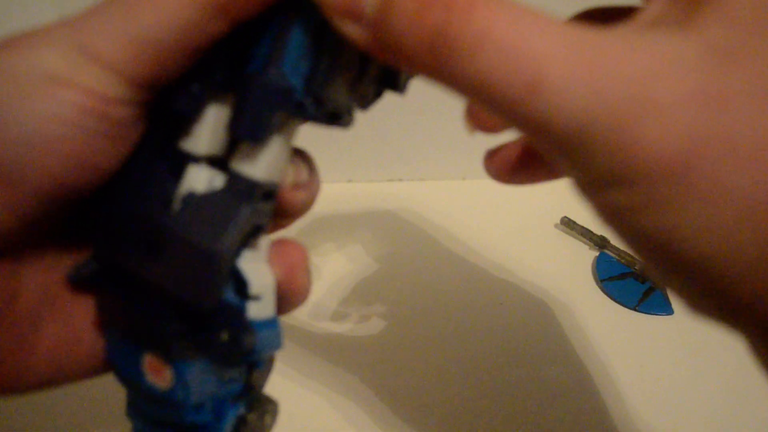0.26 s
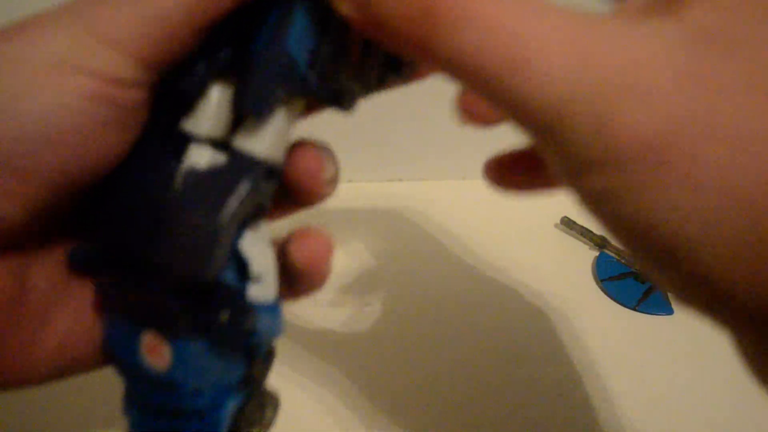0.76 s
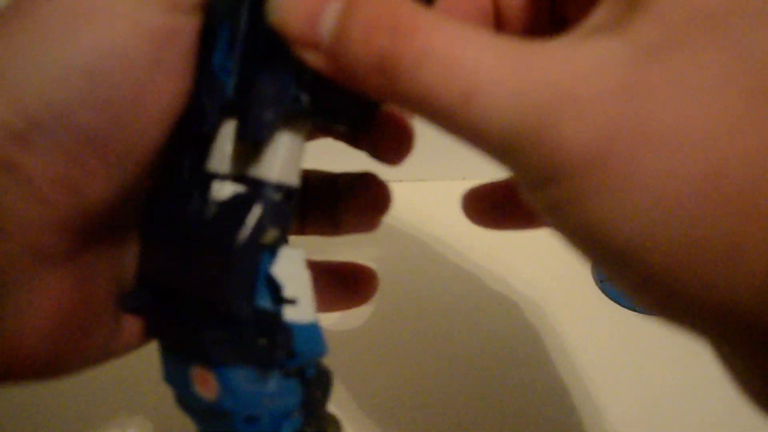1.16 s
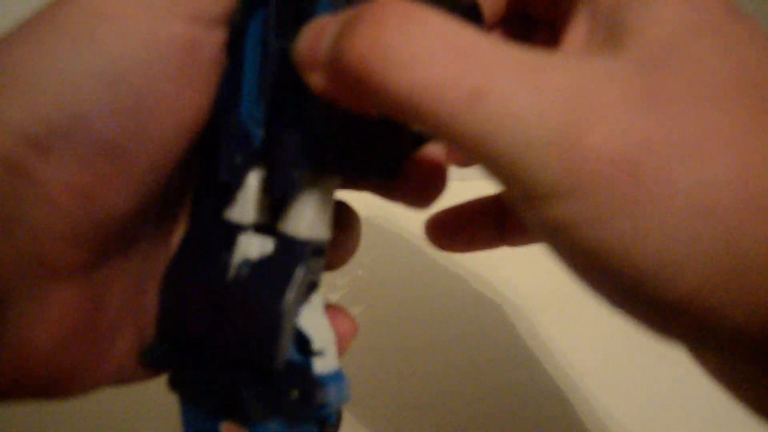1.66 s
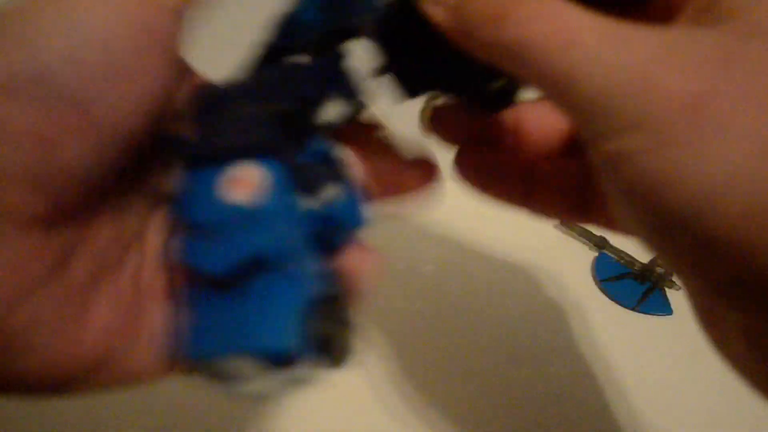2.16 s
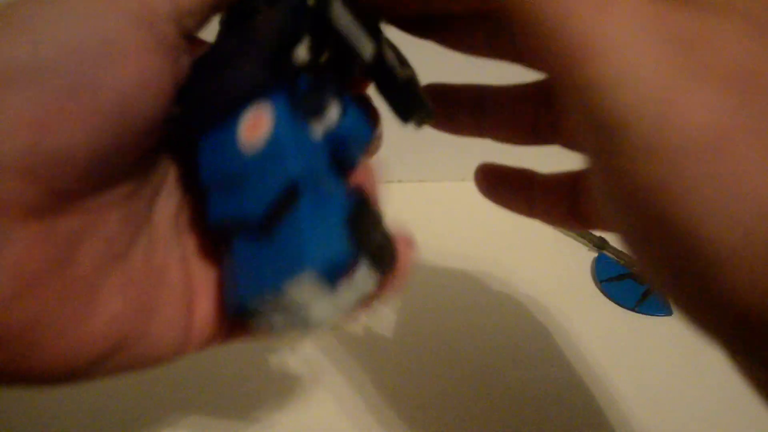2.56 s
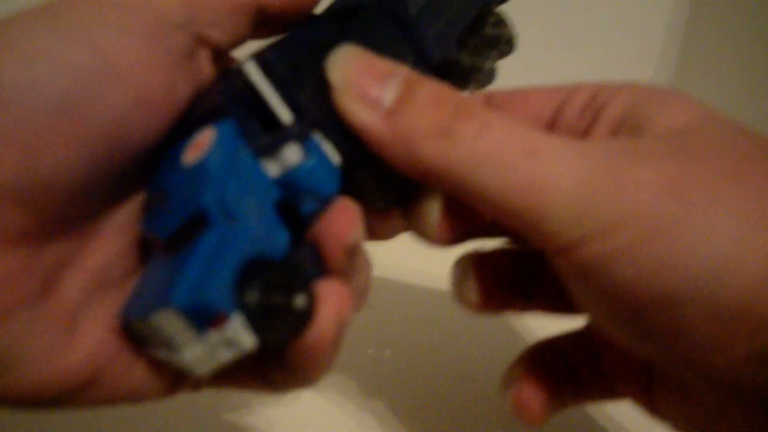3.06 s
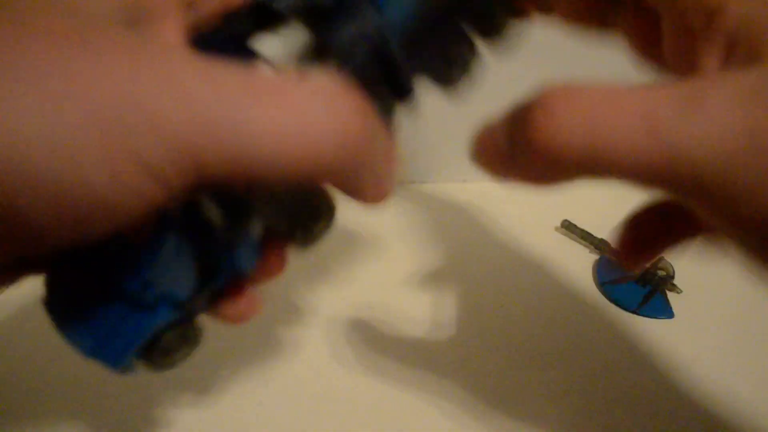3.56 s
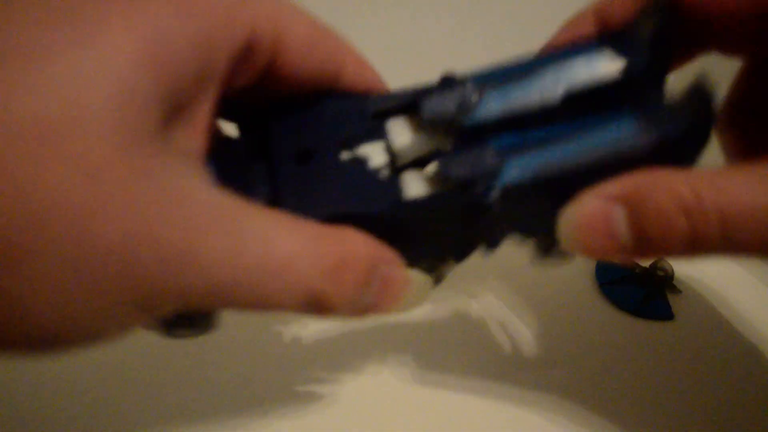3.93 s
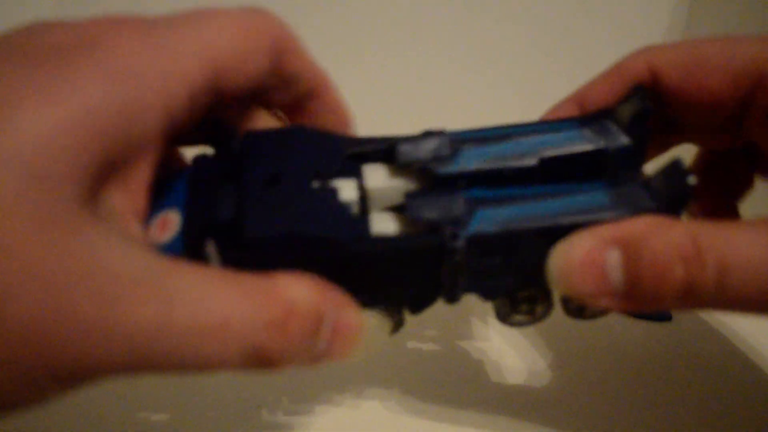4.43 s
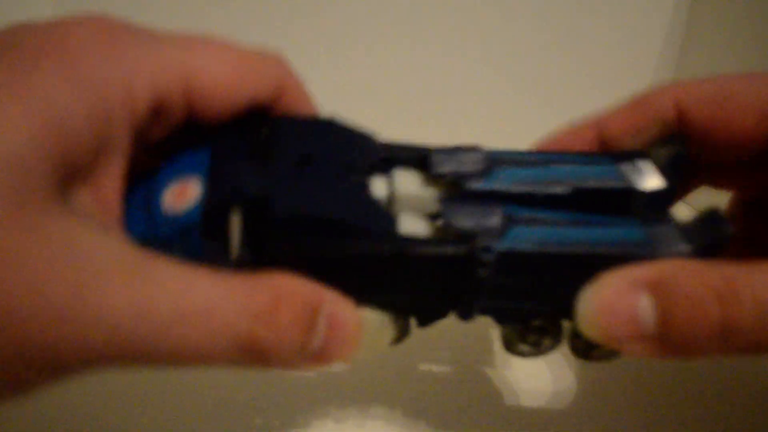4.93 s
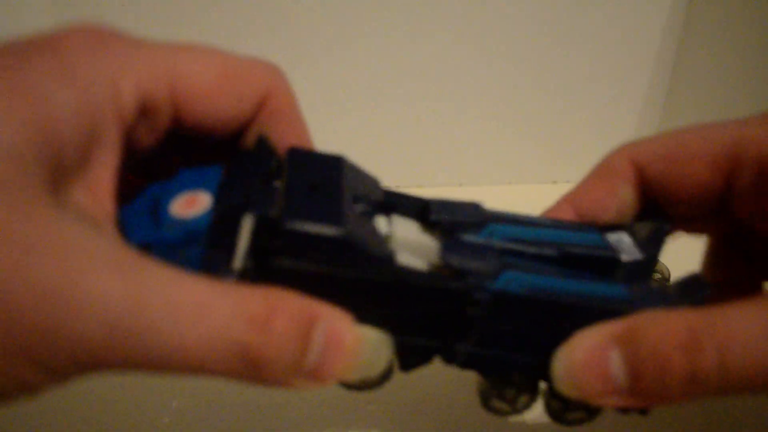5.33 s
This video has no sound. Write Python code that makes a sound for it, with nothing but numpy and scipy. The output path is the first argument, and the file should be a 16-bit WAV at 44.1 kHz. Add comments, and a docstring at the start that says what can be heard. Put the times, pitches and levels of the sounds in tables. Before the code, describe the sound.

Close handling of a jointed plastic toy: sparse clicks grow into snapping, creaking and loose rattling, with soft bumps and finger swishes.

```python
"""A hollow plastic toy figure is folded by hand at close range, in a small room that answers every move.
From the start, filtered noise gives the air and the hands' rumble; two sines give a faint hum and a thin whine.
Joints click and soft bumps land at once: bursts of tiny impacts ring the shell, bumps are short low pulses.
From about 0.65 s tight parts scrape in clumps of ringing grains and loose parts rattle; a big snap lands near 2.5 s.
From 3.5 s fingers swish over the shell as coloured noise; after a last firm snap near 5.1 s scraping goes on."""
import sys
import numpy as np
from scipy import signal
from scipy.fft import rfft, irfft, next_fast_len
from scipy.io import wavfile
from scipy.ndimage import uniform_filter1d, map_coordinates

SR = 44100
rng = np.random.default_rng(int(sys.argv[2]) if len(sys.argv) > 2 else 0)


def store_wav(level_fs):
    """Save 16-bit WAV to argv[1]."""
    pcm = np.round(np.clip(np.atleast_2d(level_fs), -1, 1) * 32767)
    wavfile.write(sys.argv[1], SR, pcm.T.astype(np.int16))


N = 246519  # length in samples


def amp(db):
    """Decibels to gain."""
    return 10 ** (np.asarray(db) / 20)


def unit(x):
    """Scale to rms 1."""
    return x / np.sqrt(np.mean(x ** 2) + 1e-20)


def along(points, hz):
    """Read (Hz, value) points on a log frequency axis."""
    point_hz, values = np.transpose(points)
    return np.interp(np.log(hz + 1), np.log(point_hz + 1), values)


def curve(rows):
    """Join (s, value) points by straight lines, one value per sample."""
    return np.interp(np.arange(N) / SR, *np.transpose(rows))


def wobble(rate):
    """A smooth random curve with rate knots a second."""
    knots = rng.standard_normal(int(N * rate / SR) + 4)
    return map_coordinates(knots, [np.arange(N) * rate / SR])


def add(track, s, sound):
    """Mix a sound into the track at time s."""
    part = track[max(0, round(s * SR)):][:len(sound)]
    part += sound[:len(part)]


def coloured(x, spectrum):
    """Minimum-phase filter with the given spectrum, so that attacks stay sharp."""
    m = 2 * next_fast_len(len(x))
    level_db = along(spectrum, np.fft.rfftfreq(m, 1 / SR))
    cepstrum = irfft(np.log(amp(level_db)), m)
    # folding the cepstrum forward makes the filter causal
    cepstrum[1:m // 2] *= 2
    cepstrum[m // 2 + 1:] = 0
    return irfft(rfft(x, m) * np.exp(rfft(cepstrum)), m)[:len(x)]


def band(x, edges_hz, order=3):
    """Causal band-pass."""
    return signal.sosfilt(signal.butter(order, edges_hz, "bandpass", fs=SR, output="sos"), x)


def resonance(x, hz, q):
    """One resonance of quality q."""
    return signal.lfilter(*signal.iirpeak(hz, q, fs=SR), x)


def ring(t, hz, t60):
    """One damped mode: a sine that falls by 60 dB in t60 seconds."""
    return np.sin(2 * np.pi * hz * t) * amp(-60 * t / t60)


def stroke(start, length, attack, release):
    """Gain of one hand movement: it swells, holds and dies away, 20 dB per attack or release time."""
    t = np.arange(N) / SR
    before = np.maximum(start - t, 0)
    after = np.maximum(t - start - length, 0)
    return amp(-20 * (before / attack + after / release))


# steady hum and whine: pitch_hz, level_db (rms)
TONES = [(350, -73), (15671, -82.5)]


def hum_and_whine():
    """Steady electrical tones: a faint hum and a thin, very high whine, each a pure sine."""
    t = np.arange(N) / SR
    return sum(amp(db) * unit(np.sin(2 * np.pi * hz * t)) for hz, db in TONES)


# colour of the room noise: frequency_hz, density_db (per Hz, relative)
AIR_COLOUR = [(15, -22.5), (25, -44), (90, -24), (125, -12.5), (237, -9), (309, -7.5), (354, -2.5),
              (588, -18.5), (637, -12), (691, -17.5), (952, -12.5), (1240, -14), (2020, -20.5),
              (2370, -26.5), (15000, -53.5)]


def air(level_db=-55.5):
    """Steady room noise: coloured random noise."""
    return amp(level_db) * unit(coloured(rng.standard_normal(N), AIR_COLOUR))


# rumble of the moving hands: time_s, level_db (before its lumps)
HAND_RUMBLE = [(0, -72.5), (1.4, -72), (2.2, -68), (2.5, -62.5), (2.9, -68), (3.6, -57.5), (3.85, -71),
               (4.4, -61), (5.1, -66), (5.59, -63)]


def rumble(lows_hz=(28, 110), lumps_db=3.0, lump_rate=19):
    """Moving hands rumble: low noise whose level follows the movement and wanders in lumps."""
    lows = unit(band(rng.standard_normal(N), lows_hz, order=2))
    return amp(curve(HAND_RUMBLE) + lumps_db * wobble(lump_rate)) * lows


# modes of the hollow shell: pitch_hz, level_db (relative), t60_s; each contact scatters pitch and level
SHELL_MODES = [(700, -7.5, 0.019), (950, -12, 0.0081), (1180, -14.5, 0.054), (1566, -5.5, 0.021),
               (1647, 0.5, 0.016), (1856, -6.5, 0.064), (1969, -4.5, 0.034), (2204, -6.5, 0.021),
               (2493, -4.5, 0.04), (2702, 2, 0.024), (2893, -4, 0.034), (3086, 0, 0.019),
               (3534, -2.5, 0.03), (3895, 0, 0.017), (4590, 2, 0.0059), (5170, -6, 0.033),
               (5510, -4.5, 0.017), (6400, -5.5, 0.013), (7640, -7, 0.018), (8080, -6.5, 0.0087),
               (12260, -1.5, 0.018), (14300, -12.5, 0.0052)]


def shell(t, scatter_db):
    """The shell's answer to one contact; grip and contact point shift its modes."""
    answer = np.zeros(len(t))
    for hz, db, t60 in SHELL_MODES:
        pitch_chance, level_chance, side = rng.standard_normal(3)
        shifted_hz = hz * (1 + .015 * pitch_chance)
        answer += np.sign(side) * amp(db + scatter_db * level_chance) * ring(t, shifted_hz, t60)
    return answer


KNOCK_HZ, SHELL_HZ, EDGE_HZ, TICK_HZ = (480, 1400), (1200, 4500), (4500, 9600), (10500, 15400)
PANEL_SWING = 0.13  # a harder click swings the panel more (dB per dB above a light click)
LIGHT_CLICK_DB = -40
CLICK_SPAN_S = .01  # a click's shell level is its energy spread over this time
CLICK_SAMPLES = SR // 10


def click(shell_db, panel_hz, knock_db, edge_db, tick_db, slip_t60=0.015, rise=0.00061,
          crack_db=-3, crack_t60=0.036, panel_db=-4, panel_t60=0.018, panel_q=1.0, treble_t60=0.18):
    """A tab slips over its catch in a burst of tiny impacts that rings the shell and the struck panel."""
    t = np.arange(CLICK_SAMPLES) / SR
    onset = 1 - np.exp(-(t / rise) ** 2)
    slips = rng.standard_normal(len(t)) * onset * amp(-60 * t / slip_t60)
    body = signal.fftconvolve(slips, shell(t, scatter_db=2.5))[:len(t)]
    crack = rng.standard_normal(len(t)) * onset * amp(-60 * t / crack_t60)
    blow = unit(body) + amp(crack_db) * unit(crack)
    # modes near the pitch of the struck panel answer most strongly
    near = unit(resonance(band(blow, SHELL_HZ, order=4), panel_hz, panel_q))
    swing_db = panel_db + PANEL_SWING * (shell_db - LIGHT_CLICK_DB)
    panel = amp(swing_db) * unit(onset * ring(t, panel_hz, panel_t60))
    # the panel swings with those modes, never against them
    sound = unit(near + np.sign(near @ panel) * panel)
    # a heavy push adds knock; a hard corner adds edge and tick, which the plastic damps sooner
    bright = blow * amp(-60 * t / treble_t60)
    for source, edges_hz, db in ((blow, KNOCK_HZ, knock_db), (bright, EDGE_HZ, edge_db), (bright, TICK_HZ, tick_db)):
        sound = sound + amp(db) * unit(band(source, edges_hz, order=4))
    return amp(shell_db) * sound * np.sqrt(CLICK_SPAN_S / t[-1])


# joints and tabs that click: start_s, shell_db (over 10 ms, before the trim), panel_hz,
# knock_db, edge_db, tick_db (these three against the shell)
JOINT_CLICKS = [(0.0124, -50.5, 1716, -21, 10, 5), (0.1164, -51.5, 1690, -9, -5, -8.5),
                (0.643, -56, 1610, -10, -1, -21), (0.6695, -45.5, 1740, -8, -9.5, -19),
                (0.7, -48, 1570, -6, -23, -40), (0.776, -42.5, 2180, -28, -9.5, -38),
                (0.948, -36.5, 1570, -34, -12, -18), (0.956, -38.5, 1850, -31, -3.5, -24),
                (1.0598, -41, 1720, -10.5, -4, -33), (1.083, -39.5, 1760, -12, -20, -20.5),
                (1.0892, -30.5, 1810, -21, 1.5, -16), (1.132, -40, 1850, -25, -14, -35),
                (1.3279, -34, 1835, -30, -5, -25), (1.352, -57, 1710, -11, -5, -5),
                (1.4378, -28.5, 1640, -24, -9, -23.5), (1.5478, -55, 1750, -20, -30, -35),
                (1.5667, -44, 1620, -15, -18, -39), (1.6092, -37.5, 1630, -29, -25, -40),
                (1.726, -30.5, 2565, -13, -8, -18), (1.744, -49.5, 2530, -0.5, 1, -21),
                (1.7683, -28, 2640, -16.5, -16.5, -10), (1.8415, -45, 1760, -7.5, -22, -30),
                (1.978, -36, 1680, -38, -15, -19.5), (2.051, -36, 2540, -26, -27, -42),
                (2.0796, -40.5, 2660, -32, -13, -26), (2.1621, -42, 2900, -30, -6.5, -36),
                (2.2194, -32.5, 2100, -27, -11.5, -40), (2.262, -35.5, 2755, -30, -16, -39),
                (2.3208, -36.5, 1560, -13, 0, -40), (2.327, -34.5, 3100, -16, -7, -8),
                (2.34, -36.5, 3070, -23, -7, -26.5), (2.4417, -50, 2380, -20, -7, -14),
                (2.4812, -18, 1925, -19, -9, -10), (2.483, -23, 1394, -11.5, -11, -9.5),
                (2.489, -20, 2810, -46, -22, -34), (2.595, -40, 2070, -36, -2, -34.5),
                (2.612, -37, 3880, -35, -16, -18), (2.6519, -30, 2814, -43, -11.5, -35),
                (2.668, -35, 2740, -18, -19, -34), (2.703, -45, 3100, -27, -20, -39),
                (2.808, -53, 1760, -23, -8, -20), (2.8595, -43, 2850, -12.5, -19, -36),
                (2.9409, -45, 2610, -9, -11, -16), (2.993, -42.5, 1840, -8, -4, -22),
                (3.023, -42.5, 2070, -1, -3, -23.5), (3.05, -43.5, 1900, -34, -17, -43),
                (3.117, -42.5, 2810, -33, -29, -38), (3.3051, -39, 2790, -13, -15, -40),
                (3.4024, -29, 1777, -16, -14, -30.5), (3.4322, -33, 1695, -38, -19, -29),
                (3.482, -34, 1806, -11.5, -10, -28), (3.5403, -33, 3000, -14, -9.5, -30),
                (3.6475, -26.5, 1938, -21, -16.5, -26), (3.7308, -36.5, 3300, -22, -27, -39),
                (3.82, -41, 3080, -10, -16, -31), (3.8442, -41, 2650, -7.5, -17, -18.5),
                (3.8871, -31.5, 2020, -12, -5, -30), (4.085, -42.5, 1535, -37, -26, -39),
                (4.1425, -52, 3180, -5, -29, -32), (4.242, -55, 3780, -15, -11, -19),
                (4.334, -54, 2660, -9, -31, -37), (4.372, -50.5, 2520, -29, -9.5, -27),
                (4.414, -47, 1657, -13, -22, -26), (4.504, -48, 2490, -9, -7.5, -30),
                (4.598, -41.5, 2810, -4, -12.5, -37), (4.6384, -39, 2900, 0.5, -4, -22),
                (4.643, -40.5, 2800, -13, -9, -12), (4.7447, -49.5, 1560, -3.5, -20, -37),
                (4.886, -55.5, 1470, -16, -12, -19), (4.987, -42, 2930, -19, -32, -37),
                (5.089, -36, 2920, -14, -16.5, -26), (5.129, -23, 2920, -11.5, -10, -15),
                (5.169, -41, 3300, -20, -8, -16.5), (5.184, -36.5, 2650, -13, -17, -32),
                (5.2536, -45, 1920, -16, -16, -31), (5.302, -49, 2770, -7, -17, -33)]


def clicks(trim_db=-1.0):
    """All the joints and tabs, each a burst of impacts on the shell."""
    track = np.zeros(N)
    for start, *contact in JOINT_CLICKS:
        add(track, start, click(*contact))
    return amp(trim_db) * track


# decay of the room: frequency_hz, t60_s (of the tail without its early boost)
ROOM_DECAY = [(300, 0.62), (2000, 0.2), (6000, 0.14), (14000, 0.19)]


def room(x, delay=0.0065, early_gain=1.2, early_life=0.041, treble_db=-2.5):
    """Table and near walls answer within a few ms: decaying noise, boosted early and duller in the treble."""
    hz, t, cells = signal.stft(rng.standard_normal(SR // 3), SR, nperseg=256)
    early = 1 + early_gain * np.exp(-t / early_life)
    dull = amp(along([(3000, 0), (8000, treble_db)], hz))[:, None]
    decay = amp(-60 * t / along(ROOM_DECAY, hz)[:, None])
    tail = signal.istft(cells * dull * early * decay, SR, nperseg=256)[1]
    delayed = np.pad(x, (round(delay * SR), 0))
    return signal.fftconvolve(delayed, tail / np.linalg.norm(tail))[:N]


# soft bumps of the hands: start_s, level_db (peak of the pulse envelope), pitch_hz (it wavers)
HAND_BUMPS = [(0.04, -48, 162), (0.264, -45, 74), (1.737, -47, 64), (2.501, -56, 58), (2.627, -45, 48.3),
              (3.095, -45, 55), (3.306, -45, 61), (3.526, -39.5, 376), (3.535, -44, 170),
              (3.957, -37.5, 173), (4.245, -47, 44), (4.357, -45, 179), (4.406, -46, 144), (4.634, -42, 75),
              (4.69, -47, 62), (4.997, -43, 177)]


def bumps(swell=0.011):
    """Soft fingers bump the shell: low pulses that swell for some ms, with a wavering pitch."""
    t = np.arange(SR // 6) / SR
    push = (t / swell) ** 2 * np.exp(2 * (1 - t / swell))
    track = np.zeros(N)
    for start, db, hz in HAND_BUMPS:
        waver = 1 + 0.21 * unit(uniform_filter1d(rng.standard_normal(len(t)), size=300))
        add(track, start, amp(db) * push * np.sin(2 * np.pi * hz * np.cumsum(waver) / SR))
    return track


# pushes that slide one part along another: start_s, length_s, level_db (of the force),
# upper_db (upper against lower modes; small stiff parts favour the upper ones)
PART_PUSHES = [(0.76, 0.082, -42.5, -6), (0.858, 0.046, -56, -11.5), (0.931, 0.016, -37, 0.5),
               (1.042, .1, -45, -4.5), (1.552, 0.043, -56, -15), (1.752, 0.023, -39.5, -11),
               (1.846, 0.064, -52.5, -10.5), (1.961, 0.034, -42, 1.5), (2.064, 0.21, -41, -1),
               (2.321, 0.043, -34, 8.5), (2.45, 0.072, -34, -3), (2.605, 0.11, -37.5, 8),
               (2.822, 0.1, -52.5, -7), (2.998, 0.059, -38, 2), (3.296, 0.067, -43, -6.5),
               (3.408, .16, -36.5, -2), (3.651, 0.3, -46, 2), (4.095, 0.093, -62, 3.5),
               (4.43, 0.1, -50.5, 0.5), (4.638, 0.032, -42.5, 0), (4.967, 0.024, -43, 4),
               (5.036, .16, -43.5, 5.5), (5.329, 0.068, -62, 5), (5.47, 0.39, -51, 7.5)]
PUSH_ATTACK_S, PUSH_RELEASE_S = 0.031, 0.03  # time to rise and to fall by 20 dB
GRIP_DB = -66.5  # the held toy keeps creaking faintly between pushes
GRIP_START_S, GRIP_END_S = .65, 5.59


def pushing():
    """Force on the parts, and the weight of the upper modes that the moving part gives."""
    pushes = np.array([amp(db) * stroke(start, length, PUSH_ATTACK_S, PUSH_RELEASE_S)
                       for start, length, db, _ in PART_PUSHES])
    grip = amp(GRIP_DB) * stroke(GRIP_START_S, GRIP_END_S - GRIP_START_S, PUSH_ATTACK_S, PUSH_RELEASE_S)
    force = pushes.sum(axis=0) + grip
    upper_db = np.array(PART_PUSHES)[:, -1] @ pushes / force
    return force, amp(upper_db)


# colour of the scraping grit: frequency_hz, density_db (per Hz, relative)
GRIT_COLOUR = [(200, -60), (600, -9), (1100, -15), (1500, -1), (1800, 7), (2250, 1.5), (2850, 6.5),
               (3600, -3.5), (4600, -6.5), (6500, -19), (8000, -13.5), (10000, -21.5), (12500, -19.5),
               (16000, -47.5)]
GRIP_SAMPLES = SR // 30  # the shell's answer is redrawn this often


def scrape(clump_db=6.0, clump_rate=130, catch_rate=110, catch_db=9.5, catch_t60=0.019,
           grit_db=-2.5, trim_db=-1.5):
    """Tight parts stick and slip: clumps of fine grains ring the shell, which changes as the grip moves."""
    t = np.arange(GRIP_SAMPLES) / SR
    # small ridges catch at uneven moments and let go in a short spurt of grains
    ridges = np.cumsum(catch_rate * amp(5.9 * wobble(110))) / SR
    catches = np.diff(np.floor(ridges), prepend=0) * rng.uniform(0.31, 1, N)
    spurts = amp(catch_db) * signal.fftconvolve(catches, amp(-60 * t / catch_t60))[:N]
    grains = rng.standard_normal(N) * amp(clump_db * wobble(clump_rate)) * (.5 + spurts)
    rung = np.zeros(N)
    for start in range(0, N, len(t)):
        answer = unit(shell(t, scatter_db=5.0))
        add(rung, start / SR, signal.fftconvolve(grains[start:start + len(t)], answer))
    force, upper = pushing()
    low_modes = unit(band(rung, (1550, 2100), order=2))
    high_modes = unit(band(rung, (2400, 4400), order=2))
    modes = (low_modes + upper * high_modes) / np.hypot(1, upper)
    grit = amp(grit_db) * unit(coloured(grains, GRIT_COLOUR))
    return amp(trim_db) * force * unit(modes + grit)


def rattle(count=330, size=14, level_db=-8.5, spread_db=4, panels_hz=(1650, 3500), middle_hz=2450,
           stiffening=.35, scatter=.2):
    """Loose parts tap the shell at random: harder under more force, higher when a stiff part moves."""
    force, upper = pushing()
    pitches = np.geomspace(*panels_hz, size)
    taps = [click(level_db, hz, knock_db=-15.5, edge_db=-20, tick_db=-36, slip_t60=0.0055,
                  rise=0.00033, crack_t60=0.01, panel_t60=0.012) for hz in pitches]
    track = np.zeros(N)
    for when, strength, part in rng.uniform(0, 1, (count, 3)):
        at = int(when * N)
        hz = middle_hz * upper[at] ** stiffening * (1 + scatter * (2 * part - 1))
        tap = taps[np.argmin(abs(pitches - hz))]
        add(track, at / SR, force[at] * amp(spread_db * (2 * strength - 1.5)) * tap)
    return track


# fingers sliding over the shell: start_s, length_s, level_db (before the flutter)
FINGER_SLIDES = [(3.51, 0.037, -50.5), (3.835, 0.14, -50), (4.018, 0.26, -60), (4.449, 0.1, -60.5),
                 (4.987, .08, -58), (5.482, .09, -66)]
SLIDE_ATTACK_S, SLIDE_RELEASE_S = 0.092, 0.16  # time to rise and to fall by 20 dB
# colour of skin on plastic: frequency_hz, density_db (per Hz, relative)
SWISH_COLOUR = [(100, -9.5), (350, -18), (500, -2.5), (680, 9.5), (850, -5.5), (1400, 6), (2200, -6),
                (4000, -15), (6000, -21.5), (8000, -17), (13000, -18.5), (16000, -26)]


def swish(flutter_db=0.3, flutter_rate=76):
    """Skin slides over the plastic: coloured noise that follows the strongest stroke and flutters slightly."""
    strokes = [amp(db) * stroke(start, length, SLIDE_ATTACK_S, SLIDE_RELEASE_S)
               for start, length, db in FINGER_SLIDES]
    sliding = np.max(strokes, axis=0)
    return sliding * amp(flutter_db * wobble(flutter_rate)) * unit(coloured(rng.standard_normal(N), SWISH_COLOUR))


def scene(room_db=-16.0):
    """The toy in the hands, in its room."""
    toy = rumble() + clicks() + bumps() + scrape() + rattle() + swish()
    return (toy + amp(room_db) * room(toy) + hum_and_whine() + air())[None]


TOP_HZ = 16000


def record(dry):
    """A sharp band limit: nothing at or above the top frequency is kept."""
    m = next_fast_len(N + SR // 4)
    kept = np.fft.rfftfreq(m, 1 / SR) < TOP_HZ
    return irfft(rfft(dry, m) * kept, m)[..., :N]


dry = scene()
out = record(dry)
store_wav(out)
```